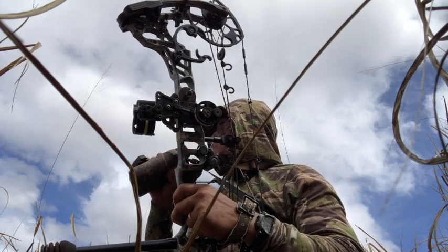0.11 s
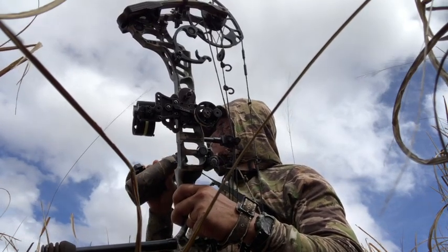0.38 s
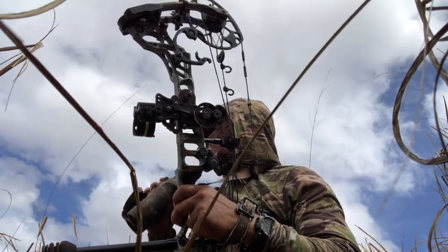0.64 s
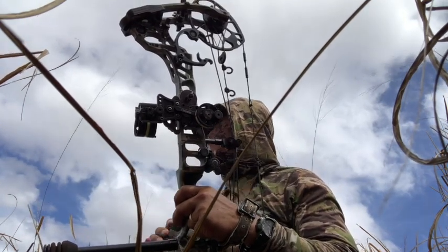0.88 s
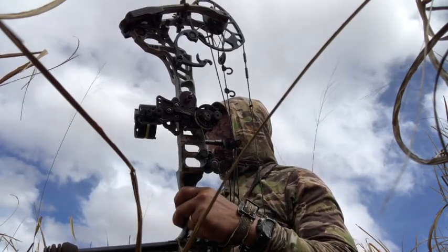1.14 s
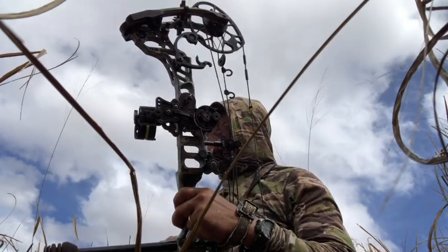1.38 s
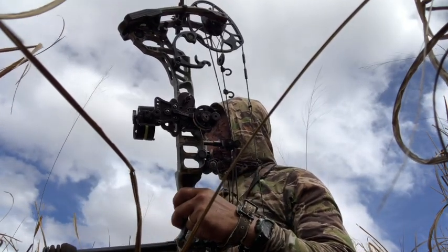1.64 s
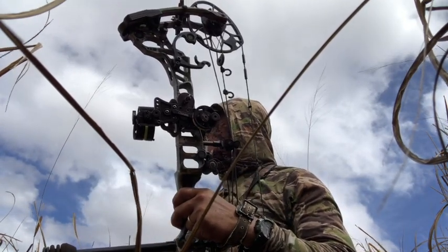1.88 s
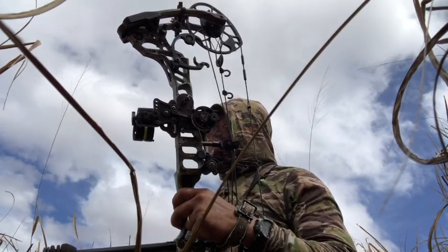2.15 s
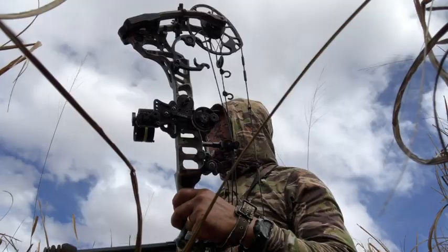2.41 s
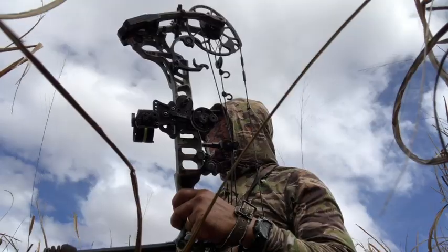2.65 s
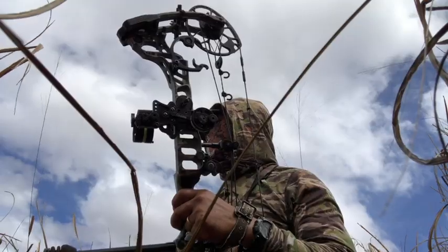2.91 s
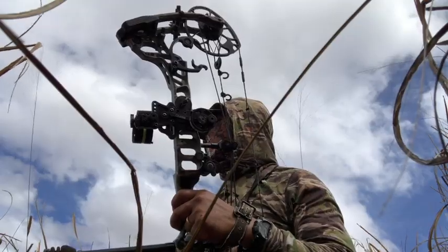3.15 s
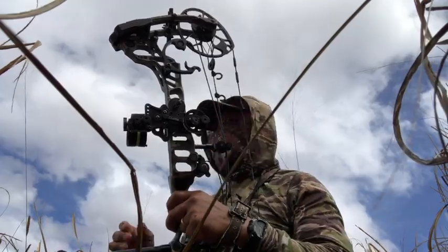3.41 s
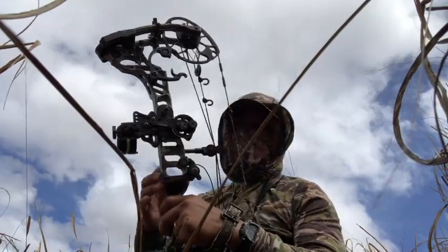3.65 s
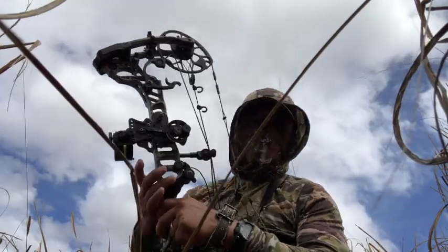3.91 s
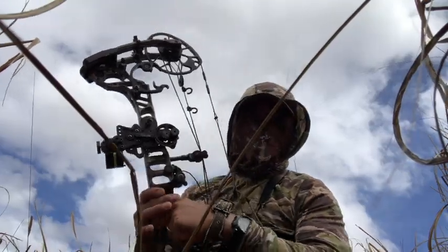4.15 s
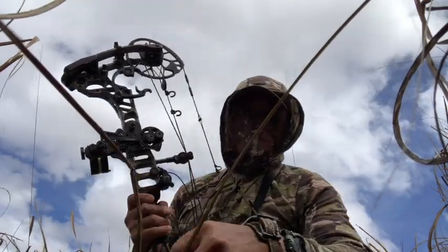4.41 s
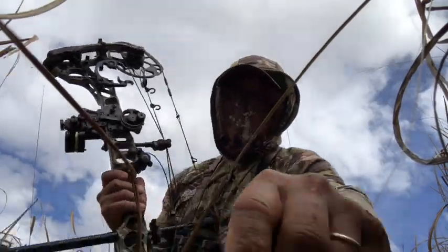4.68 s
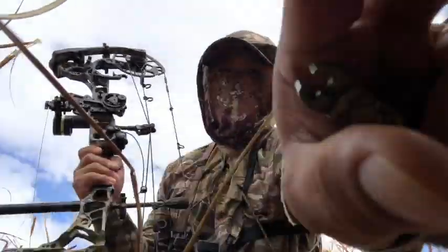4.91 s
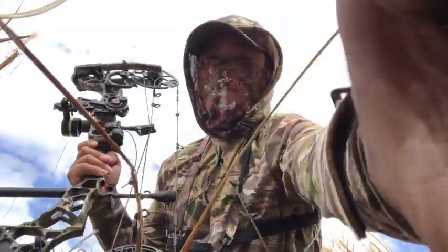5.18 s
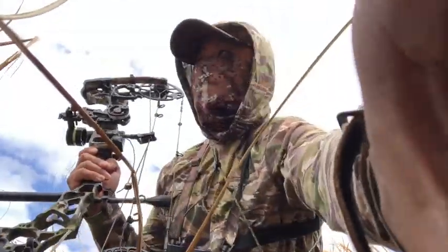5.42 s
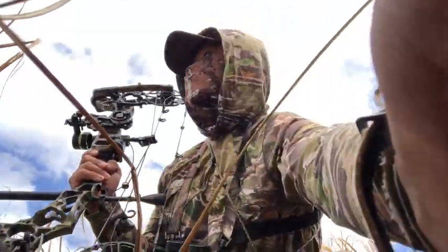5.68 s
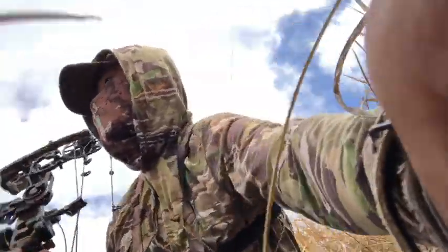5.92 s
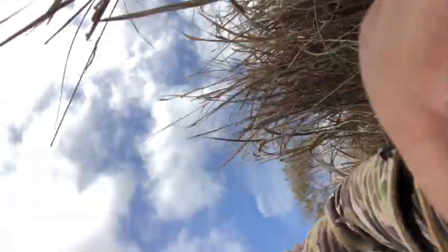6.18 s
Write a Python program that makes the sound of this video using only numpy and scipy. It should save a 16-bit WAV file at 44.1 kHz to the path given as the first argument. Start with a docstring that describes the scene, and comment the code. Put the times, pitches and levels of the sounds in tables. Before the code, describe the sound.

Quiet breezy field, sparse grass ticks, then sleeves rustle and a hand grabs the camera with one very loud crack, thumps, scrapes and crackling.

```python
"""Dry grass and a handled camera

A still field of dry grass under open sky: filtered noise for air and hiss, stalks that tick now and then
as someone shifts. Then sleeves and grass rustle close by (noise mixed with tiny cracks), and a hand takes
hold of a small camera: stalks snap beside the microphone as bursts with a ring, fingers knock and rub
on the housing and excite its modes, and narrow noise bands squeak and scrape."""
import sys
import numpy as np
from scipy import signal
from scipy.io import wavfile

SR = 44100
rng = np.random.default_rng(int(sys.argv[2]) if len(sys.argv) > 2 else 0)


def volts(x):
    """Linear amplitude factor 10**(x/20) for a level x in dB, scalar or array-like."""
    e = np.asarray(x, float) / 20
    return 10 ** e


def log_audio(samples):
    """Write samples as a 16-bit WAV file to the path given in sys.argv[1]."""
    # one column per channel
    frames = np.atleast_2d(samples).T
    # limit to full scale, then quantise
    limited = np.clip(frames, -1, 1)
    pcm = np.round(limited * 32767).astype(np.int16)
    wavfile.write(sys.argv[1], SR, pcm)


N = 278145   # length in samples


def rms_one(x):
    """Normalization: scale a signal to unit rms."""
    return x / np.sqrt(np.mean(x ** 2) + 1e-20)


def butter(x, order, hz, kind):
    """Butterworth filtering: a maximally flat passband."""
    return signal.sosfilt(signal.butter(order, hz, kind, fs=SR, output="sos"), x)


def at_hz(points, hz):
    """Spectral interpolation: read a spectrum on a log-frequency axis."""
    point_hz, point_db = np.transpose(points)
    return np.interp(np.log(hz), np.log(point_hz), point_db)


def drift(rate):
    """Low-passed chance: coarse noise through two equal one-pole filters at rate Hz; rms 1."""
    r = np.exp(-80 * np.pi * rate / SR)   # one coarse value every 40 samples
    noise = rng.standard_normal(N // 40 + 2002)
    slow = signal.lfilter([1], [1, -2 * r, r * r], noise)[2000:]   # without the filter's onset
    return np.interp(np.arange(N) / 40, np.arange(len(slow)), rms_one(slow))


def ring(x, hz, t60):
    """Damped resonator: a unit click sets a sine of initial height 1 ringing."""
    r, w = volts(-60 / (max(t60, 1e-4) * SR)), 2 * np.pi * hz / SR
    return signal.lfilter([0, np.sin(w)], [1, -2 * r * np.cos(w), r * r], x)


def add(out, s, sound):
    """Superposition: mix a short sound in at time s."""
    i = round(s * SR)
    out[i:i + len(sound)] += sound[:N - i]


def coloured(pair, spectrum, patchy_db, rate, tilt_db=0):
    """Filter bank: third-octave bands of two sources in turn, each flickering alone; rms 1 untilted."""
    out, power = 0, 0
    edges = 8000 * 2 ** (np.arange(-25, 5) / 3)
    for k, (low, high) in enumerate(zip(edges, edges[1:])):
        hz = np.sqrt(low * high)
        band = butter(pair[k % 2], 2, [low, high], "band")
        band = band * volts(at_hz(spectrum, hz) + patchy_db * drift(rate))
        power += np.mean(band ** 2)
        out = out + band * volts(tilt_db * np.log2(hz / 6000))   # tilt in dB per octave
    return out / np.sqrt(power)


def grains(per_s, spread_db):
    """Clustered impulse process: random clicks of very uneven size that come in clumps; rms 1."""
    sizes = volts(spread_db * np.minimum(rng.exponential(1, N), 5)) * rng.choice([-1, 1], N)
    chance = per_s * volts(5.0 * drift(25)) / SR
    return rms_one(sizes * (rng.random(N) < chance))


def narrow(size, start_hz, end_hz, width_hz):
    """Quadrature modulation: a gliding tone whose height and phase wander at random; rms 1."""
    waver = 1 + .05 * drift(7.0)[:size] * (start_hz < 4000)   # low bands bend with the uneven stroke
    phase = 2 * np.pi * np.cumsum(np.linspace(start_hz, end_hz, size) * waver) / SR
    wander = butter(rng.standard_normal((2, 14000)), 2, width_hz / 2, "low")[:, -size:]
    return rms_one(wander[0] * np.sin(phase) + wander[1] * np.cos(phase))


SWING_DB = 20   # the listed rise and fall times span this much


def swells(rows):
    """Exponential envelopes, straight in dB: total power and the power-weighted last column."""
    t, power, weighted = np.arange(N) / SR, 1e-20, 0
    for s, db, rise, fall, value in rows:
        away = np.maximum((s - t) / max(rise, .001), (t - s) / max(fall, .001))
        one = volts(db - SWING_DB * away) ** 2
        power = power + one
        weighted = weighted + one * value
    return power, weighted


# spectrum of open air and microphone hiss: (frequency [Hz], relative density [dB per Hz])
AIR = [(15, -50), (25, -12), (76, 2), (301, -3), (695, -7), (1790, -15.5), (7310, -19.5), (8360, -19.5),
       (14800, -34.5), (16000, -52)]
AIR_DB = -65.5   # level before the shelf and the gusts
HISS_STEP_HZ, HISS_STEP_DB = 8000, -3   # the hiss drops to a lower shelf above this


def air():
    """Broadband noise: far wind below with lumpy gusts, microphone hiss above with a step down on top."""
    noise = coloured(rng.standard_normal((2, N)), AIR, patchy_db=1.6, rate=4.4)
    other = noise[::-1]   # reversed in time: unrelated to the first, so they add in power
    low = butter(noise, 10, HISS_STEP_HZ, "low")
    top = butter(other, 10, HISS_STEP_HZ, "high")
    gusts = butter(other, 2, [150, 800], "band") * volts(-8 + 3 * drift(12))
    return volts(AIR_DB) * (low + volts(HISS_STEP_DB) * top + gusts)


# slow stirring of the grass: (time [s], rustle level [dB])
STIR = [(0, -76.5), (0.66, -71.5), (1.36, -68.5), (1.735, -73.5), (2.3, -70.5), (2.99, -76), (3.335, -67.5),
        (3.8, -66.5), (4.3, -61), (4.5, -64), (4.75, -54), (5.09, -45.5), (5.29, -51), (5.44, -65),
        (5.52, -56), (5.8, -45), (5.92, -61), (6.3, -52)]
# a sleeve or hand sweeps through the blades:
# (peak time [s], level [dB], rise [s], fall [s], brightness [dB per octave])
SWEEPS = [(1.15, -59.5, .003, 0.027, 2), (1.69, -58, .003, 0.027, -1), (3.503, -54, .004, 0.046, 1),
          (3.808, -62, 0.037, 0.064, -1.5), (3.916, -41, 0.011, 0.079, 0),
          (4.034, -60.5, 0.071, 0.067, 1.5), (4.086, -55.5, 0.013, 0.037, 10),
          (4.126, -47.5, .05, 0.086, -2.5), (4.427, -54, 0.11, 0.023, -1.5), (4.636, -51.5, .15, .15, -1.5),
          (4.764, -46, 0.016, 0.23, 1.5), (4.966, -44, 0.023, 0.059, -1), (5.04, -47, 0.027, 0.47, 0),
          (5.157, -31, 0.0016, 0.067, -1), (5.297, -50, 0.13, 0.11, -1), (5.361, -48, 0.082, 0.086, -3),
          (5.489, -44, 0.037, 0.044, -1.5), (5.592, -42, 0.13, 0.09, -2), (5.686, -39.5, 0.059, 0.1, 0.5),
          (5.754, -62, 0.046, .1, -3), (5.941, -58, 0.022, .1, 1), (5.989, -34.5, 0.033, 0.093, 2),
          (6.079, -32, 0.2, 0.083, -1.5), (6.185, -41.5, 0.032, 0.085, 0), (6.259, -43, 0.042, 0.025, 1)]


def movement():
    """Power addition: rustle gain and brightness from the slow stirring plus the sweeps."""
    power, weighted = swells(SWEEPS)
    stir_s, stir_db = np.transpose(STIR)
    power = power + volts(np.interp(np.arange(N) / SR, stir_s, stir_db)) ** 2
    return np.sqrt(power), weighted / power


# spectrum of the rustle before brightening: (frequency [Hz], relative density [dB per Hz])
RUSTLE_COLOUR = [(590, -23), (1000, -1.5), (2200, -1), (2810, -1.5), (3300, -1), (7350, 0.5), (9380, -2),
                 (15100, -0.5), (16000, -31)]
# nominal rate before clumping, spread of click size, share of the source power
GRAINS_PER_S, GRAIN_SPREAD_DB, GRAIN_SHARE = 1800, 4.5, 0.3


def rustle(gain, tilt_db):
    """Friction noise: blades scraping blades give a smooth hiss plus tiny cracks."""
    hiss = np.sqrt(1 - GRAIN_SHARE) * rng.standard_normal((2, N))
    cracks = np.sqrt(GRAIN_SHARE) * grains(GRAINS_PER_S, GRAIN_SPREAD_DB)
    flicker = volts(1.74 * drift(50))
    return gain * flicker * coloured(hiss + cracks, RUSTLE_COLOUR, patchy_db=1.5, rate=14.5, tilt_db=tilt_db)


TICKS_PER_S, TICK_DB = 20, 8   # mean rate; least height of the exciting click re rustle gain


def ticks(gain):
    """Poisson impulses into resonators: lone stalks click at random, each ringing a few high cycles."""
    sizes = gain * volts(TICK_DB + 3.5 * np.minimum(rng.exponential(1, N), 3))
    born = rng.random(N) < TICKS_PER_S / SR
    dealt = rng.integers(0, 8, N)   # each tick gets one of eight pitches
    out = 0
    for k, hz in enumerate(np.geomspace(6500, 14000, 8)):
        clicks = sizes * born * (dealt == k) + 1e-18   # the tiny offset keeps the filter from underflow
        out = out + ring(clicks, hz, 12 / hz)
    return out


# squeaks of fabric and skin:
# (start [s], length [s], start frequency [Hz], end frequency [Hz], level before the swell [dB])
SQUEAKS = [(4.17, 0.12, 10800, 11600, -65), (4.3, .194, 11260, 12000, -77), (4.34, 0.11, 12400, 12700, -78),
           (4.42, .07, 15000, 15100, -79), (4.46, 0.11, 9700, 9250, -63.5), (4.3, 0.13, 6870, 7000, -70),
           (5.521, .053, 839, 1300, -49), (5.965, 0.067, 4100, 4350, -44)]
SQUEAK_WIDTH_HZ = 310


def squeaks():
    """Narrow-band friction tones: each squeak glides, swells and fades."""
    out = np.zeros(N)
    for start, length, start_hz, end_hz, level_db in SQUEAKS:
        size = round(length * SR)
        swell = np.hanning(size) ** 1.1
        add(out, start, volts(level_db) * swell * narrow(size, start_hz, end_hz, SQUEAK_WIDTH_HZ))
    return out


# hollow between hand and housing: (start frequency [Hz], end frequency [Hz], width [Hz],
# start level re drag [dB], end level re drag [dB])
HOLLOW = [(357.6, 325, 26, -17, 4), (750, 830, 170, -3, -8.5), (1780, 1850, 440, -4.5, -12.5),
          (3000, 2800, 440, -4, -11), (4100, 4600, 870, -4, -13), (5200, 5300, 510, -14.5, -12)]
DRAG_AT_S, DRAG_ATTACK_S, DRAG_HOLD_S, DRAG_RELEASE_S = 5.74, 0.0143, 0.15, .04
DRAG_DB, DRAG_SAG_DB = -44, 1   # gain after the attack; its fall while held


def drag():
    """Cavity resonance: the cupped hand scrapes past the microphone, its hollow shifting as the grip closes."""
    out = np.zeros(N)
    s = DRAG_AT_S + np.cumsum([0, DRAG_ATTACK_S, DRAG_HOLD_S, DRAG_RELEASE_S])
    size = round((s[-1] - s[0]) * SR)
    for start_hz, end_hz, width_hz, start_db, end_db in HOLLOW:
        gain = volts(np.linspace(start_db, end_db, size))
        add(out, s[0], gain * narrow(size, start_hz, end_hz, width_hz))
    return out * volts(DRAG_DB + np.interp(np.arange(N) / SR, s, [-30, 0, -DRAG_SAG_DB, -30]))


def favoured(hz, centre_hz, octaves):
    """Selective excitation: modes near the favoured pitch are driven hardest."""
    return np.exp(-.5 * (np.log2(hz / centre_hz) / octaves) ** 2)


# housing modes, also struck by the knocks:
# (frequency [Hz], relative level [dB], 60 dB decay time before damping by the hand [s])
HOUSING = [(73, 11, 0.031), (120, 12, 0.03), (230, -15, 0.075), (344, 8.5, 0.029), (528, 8, 0.022),
           (747, 4.5, 0.028), (918, 11, 0.022), (1150, 3.5, 0.039), (1300, 14.5, 0.017), (1820, 12, 0.015),
           (3070, 0, 0.025), (4300, -27, .02)]
# strokes of cloth and skin on the housing:
# (peak time [s], level [dB], rise [s], fall [s], centre of the rub [Hz])
STROKES = [(3.61, -65.5, 0.14, 0.088, 390), (3.76, -78, 0.12, .3, 350), (3.881, -60.5, 0.14, 0.024, 408),
           (3.925, -49.5, 0.022, 0.058, 800), (3.99, -63, .1, .4, 420), (4.129, -59, 0.075, 0.11, 766),
           (4.21, -66.5, .15, 0.074, 450), (4.292, -63.5, 0.16, 0.046, 490),
           (4.424, -62.5, 0.15, 0.019, 880), (4.57, -57.5, 0.11, 0.13, 855),
           (4.645, -49.5, 0.095, 0.056, 736), (4.799, -57.5, .1, 0.069, 610), (4.967, -57, 0.096, 0.6, 895),
           (5.106, -56, 0.65, 0.13, 846), (5.162, -40.5, 0.023, 0.046, 920), (5.294, -52, 0.32, .07, 573),
           (5.37, -50, 0.051, 0.065, 610), (5.458, -45, 0.0086, 0.087, 473), (5.549, -47, .1, 0.057, 1000),
           (5.621, -49.5, 0.092, .1, 590), (5.653, -48, .1, 0.13, 626), (5.76, -52, .3, 1.0, 620),
           (6.02, -51.5, 0.29, .1, 605), (6.04, -39.5, 0.045, 0.047, 553),
           (6.068, -32.5, 0.033, 0.049, 600), (6.12, -70, .05, 0.065, 450), (6.192, -60, 0.028, .2, 1060)]
RUB_SPREAD_DB, RUB_WIDTH_OCTAVES = -22, .36   # drive that reaches every mode; width of the favoured region


def rub():
    """Stick-slip excitation: uneven noise drives the housing modes, which the hand damps."""
    stroke, weighted = swells(STROKES)
    centre_hz = np.maximum(weighted / stroke, 100)
    out, power = 0, 0
    slips = rng.standard_normal(N) * volts(3.0 * drift(56))
    for hz, mode_db, t60 in HOUSING:
        drive = favoured(hz, centre_hz, RUB_WIDTH_OCTAVES) + volts(RUB_SPREAD_DB)
        weight = volts(mode_db) * drive
        out = out + weight * rms_one(ring(slips, hz, 0.43 * t60))
        power = power + weight ** 2
    return out * np.sqrt(stroke / power)


# knocks on the housing: (time [s], peak level before the low cut [dB],
# frequency favoured by the spot struck [Hz], damping by the hand [0-1])
KNOCKS = [(1.292, -57, 1200, 0.6), (1.681, -54, 1060, 0), (3.917, -43, 960, 0.1), (4.11, -48, 910, 0.2),
          (4.131, -53, 404, 0.7), (4.42, -36.5, 830, 0), (4.42, -36.5, 1820, 0.2), (4.463, -51, 730, 0.6),
          (4.94, -51, 90, 0.5), (5.01, -45, 120, 0.4), (5.155, -17.5, 918, 0.8), (5.158, -31, 330, 0.34),
          (5.214, -36, 91.5, 0.2), (5.254, -34, 238, 1), (5.353, -57, 750, 0.6), (5.385, -42.5, 100, 0.6),
          (5.452, -35, 522, 0.6), (5.466, -43, 130, 0.25), (5.48, -42, 810, 0.76), (5.5, -38, 80.7, 0.9),
          (5.552, -33.5, 1150, 0.2), (5.647, -30, 556, 0.4), (5.67, -35, 326, 1), (5.719, -39.5, 780, 0.2),
          (5.752, -31.5, 666, 0.4), (6.049, -29, 270, 0), (6.077, -29, 210, 0.63),
          (6.096, -30.5, 254, 0.24), (6.192, -41.5, 1270, 0.3)]
SPOT_SPREAD_DB = 3   # each knock drives the modes a little differently


def knocks():
    """Modal impact: a short soft push rings the modes from the favoured pitch up; the grip damps them."""
    out, t = np.zeros(N), np.arange(5000) / SR
    luck = rng.normal(0, SPOT_SPREAD_DB, (len(KNOCKS), len(HOUSING)))
    push = t / .00015 * np.exp(-t / 0.00011)
    contact = np.minimum(t / .003, 1) ** 1.5   # the contact builds over a moment
    for (s, peak_db, centre_hz, damping), luck_db in zip(KNOCKS, luck):
        free = 1.1 - np.clip(damping, 0, 1)   # factor on the decay times
        knock = 0
        for (hz, mode_db, t60), more_db in zip(HOUSING, luck_db):
            drive = favoured(hz, centre_hz, octaves=0.31) + 0.31 * (hz > centre_hz)
            knock = knock + volts(mode_db + more_db) * drive * ring(push, hz, free * t60)
        knock = knock * contact
        add(out, s, volts(peak_db) * knock / np.abs(knock).max())
    return out


# stalks snap: (time [s], peak level without the crackle [dB], ring frequency [Hz],
# broad crack re ring [dB])
SNAPS = [(0.554, -54, 7270, 7), (0.8165, -49, 6500, -6), (0.9702, -41.5, 6800, 4), (1.1488, -43, 7360, -4),
         (1.197, -43.5, 12400, -4), (1.294, -46, 2520, 0), (1.3198, -53, 2440, -3),
         (1.3638, -41, 8810, -19), (1.6827, -32.5, 13100, 0), (1.694, -37, 7110, -4),
         (1.9228, -48.5, 8740, 9), (3.3056, -39, 11100, -21), (3.5003, -45, 8100, 8),
         (3.529, -57, 8100, -6), (3.909, -33, 4730, 5), (3.9185, -23, 3900, 40), (3.9396, -41, 7900, 4),
         (4.0867, -38, 9500, -8), (4.1113, -34, 5700, 15), (4.1192, -36, 11500, -5), (4.131, -37, 6850, -2),
         (4.145, -45, 9000, 8), (4.4201, -36, 4430, -2), (4.4635, -46, 2950, -8), (4.763, -32, 7400, 8),
         (4.796, -25, 12600, 15), (4.831, -33.5, 8500, -2), (4.8938, -27.5, 7200, 13),
         (4.9591, -23, 5060, 9), (5.032, -32, 7850, -2), (5.0983, -23, 7100, 13), (5.1545, 2, 6800, 7),
         (5.484, -25, 7500, -13), (5.4947, -22, 14100, -4), (5.5898, -24, 9250, 9),
         (5.619, -24.5, 8700, -6), (5.62, -34, 2900, -10), (5.6455, -10.5, 8300, -20),
         (5.665, -27, 8900, -10), (5.6807, -25.5, 4330, -9), (5.687, -24, 13100, -3),
         (5.7196, -22, 14200, 11), (5.749, -28, 7160, 5), (5.9334, -35, 3550, 0), (5.998, -29, 3200, -4),
         (6.0085, -19.5, 4300, -8), (6.0785, -21.5, 1880, -2), (6.099, -18, 2400, -4),
         (6.107, -30, 2400, -7), (6.1767, -29, 3620, 3), (6.179, -22.5, 7400, 5), (6.193, -28, 3000, -5.5),
         (6.212, -33, 12300, 6), (6.252, -35, 9650, 7), (6.2896, -40, 5200, -5)]
SNAP_T60_S, TEAR_DB_PER_DB = 0.0047, .25   # decay when crack equals ring; a broader crack tears longer
CRACKLE_DB = -4.5   # noise gain of the crackle, lowered further where the crack is below the ring
CRACK_SHARE, FIRST_BREAK = 0.48, 2.4   # crack length re ring; height of the click that opens the tearing


def snaps():
    """Brittle fracture: a burst of splitting fibres excites the stalk's ring; loose fibres crackle after."""
    out, t = np.zeros(N), np.arange(3000) / SR
    chance = rng.standard_normal((len(SNAPS), 2, len(t)))
    for (s, peak_db, hz, crack_db), noises in zip(SNAPS, chance):
        t60 = SNAP_T60_S * volts(TEAR_DB_PER_DB * crack_db)
        bass_hz = np.clip(0.22 * hz, 700, 3000)   # thin stalks give no bass
        burst, fibres = butter(noises, 2, bass_hz, "high")
        first = FIRST_BREAK * butter(t == t[8], 2, bass_hz, "high")
        tearing = np.tanh(burst) * volts(-60 * t / (CRACK_SHARE * t60)) * np.minimum(t / 0.00037, 1)
        split = first + 0.62 * tearing
        stalk = ring(split, hz, t60)
        snap = stalk / np.abs(stalk).max() + volts(crack_db) * split / np.abs(split).max()
        fade = volts(-60 * t / 0.0077) * np.minimum(t / 0.00012, 1)
        crackle = volts(CRACKLE_DB + min(crack_db, 0)) * fibres * fade
        add(out, s, volts(peak_db) * (snap / np.abs(snap).max() + crackle))
    return out


def scene():
    """Free field: all sources add with no room; the small housing gives off no deep bass."""
    gain, tilt_db = movement()
    housing = butter(rub() + knocks(), 3, 63, "high")
    grass = rustle(gain, tilt_db) + ticks(gain) + snaps()
    return (air() + grass + squeaks() + drag() + housing)[None, :]


def roll_off(x):
    """The treble ends steeply here."""
    return signal.sosfilt(signal.butter(12, 16230, fs=SR, output="sos"), x)


def record(dry):
    """Band limiting and clipping: the top is cut and peaks stop at full scale."""
    mix = np.clip(butter(dry, 8, 15700, "low"), -1, 1)
    return roll_off(mix)


dry = scene()
out = record(dry)
log_audio(out)
```